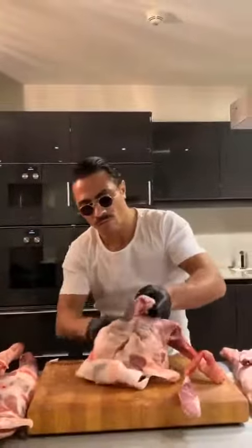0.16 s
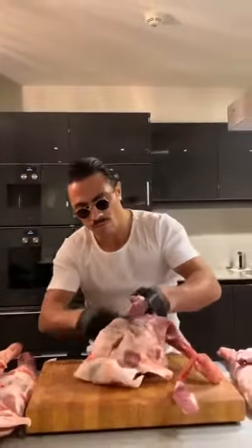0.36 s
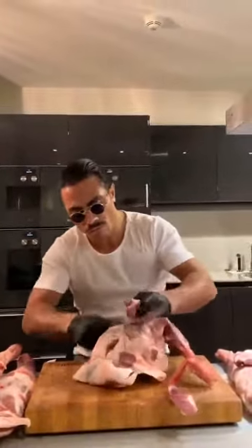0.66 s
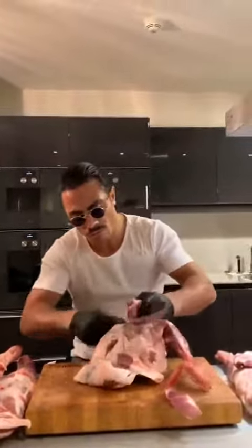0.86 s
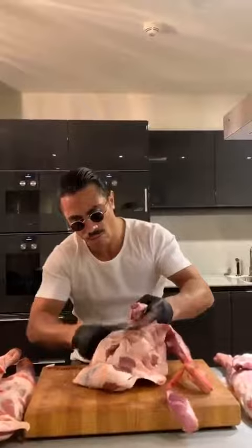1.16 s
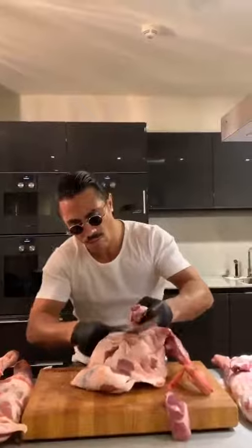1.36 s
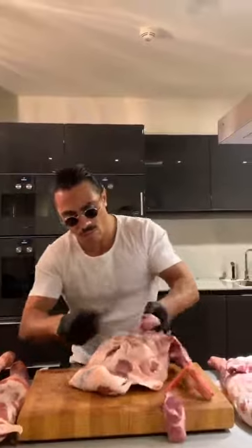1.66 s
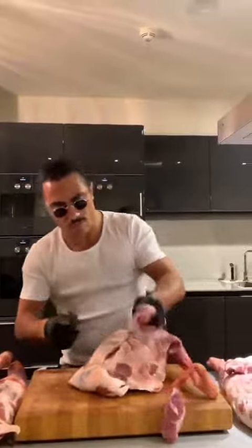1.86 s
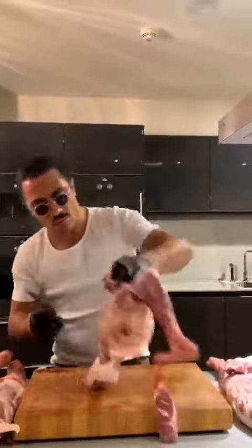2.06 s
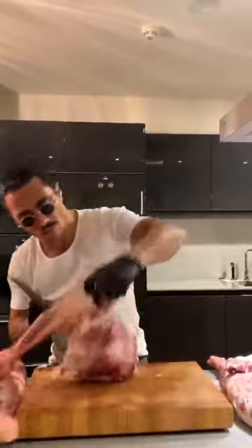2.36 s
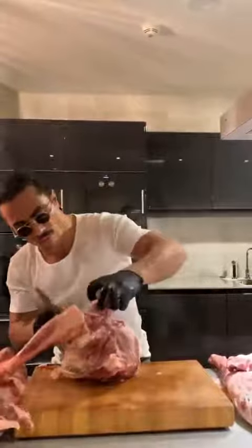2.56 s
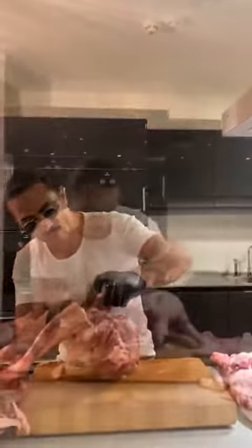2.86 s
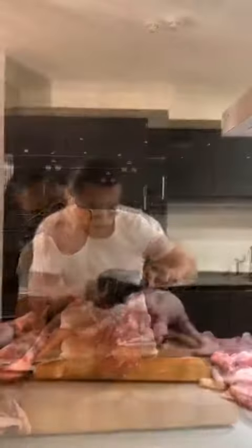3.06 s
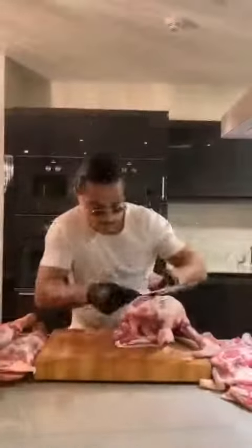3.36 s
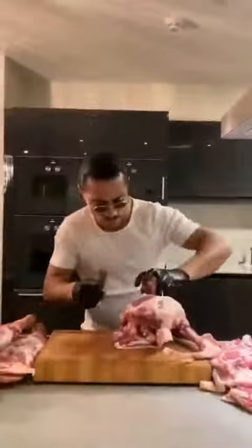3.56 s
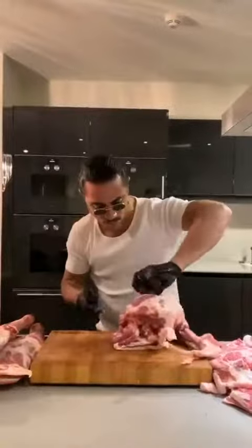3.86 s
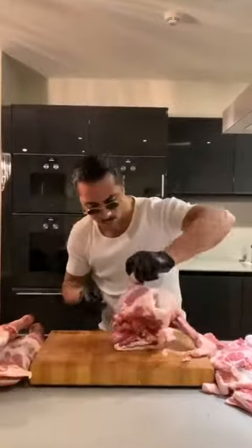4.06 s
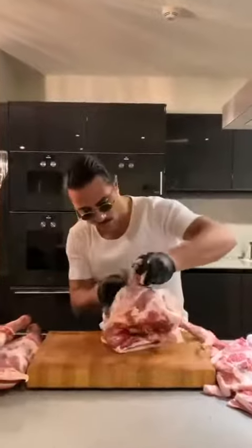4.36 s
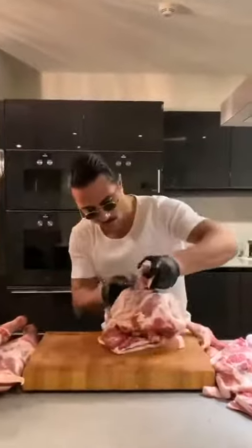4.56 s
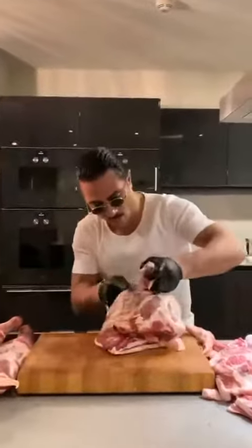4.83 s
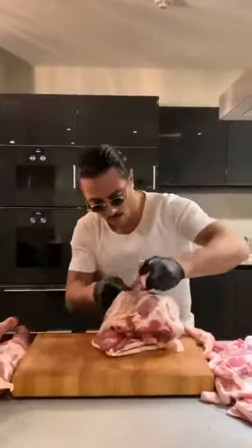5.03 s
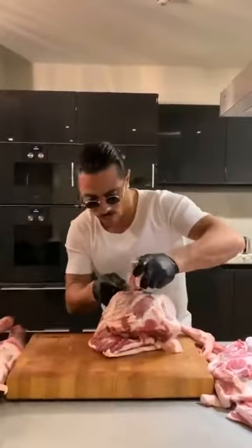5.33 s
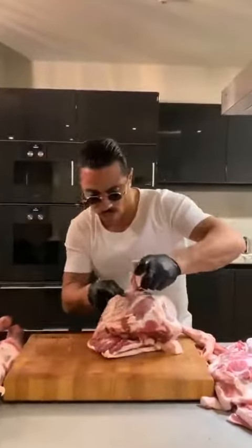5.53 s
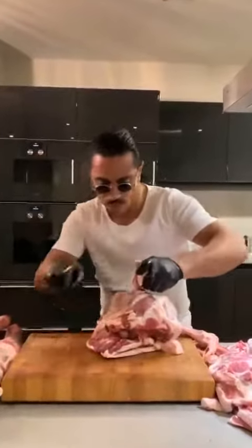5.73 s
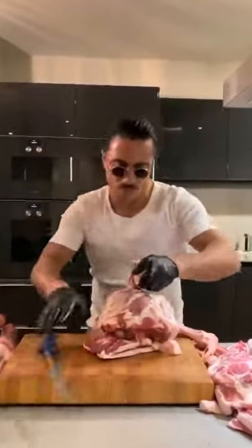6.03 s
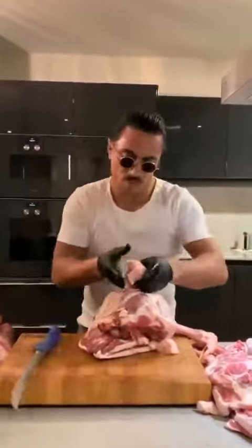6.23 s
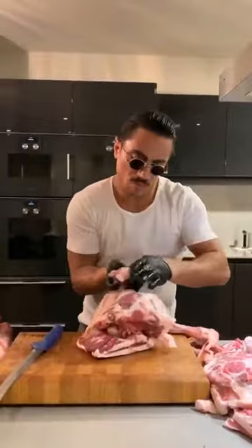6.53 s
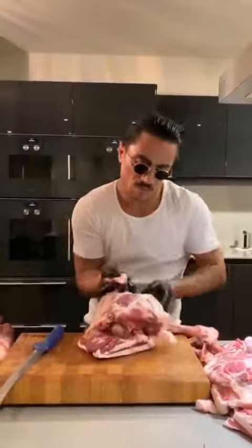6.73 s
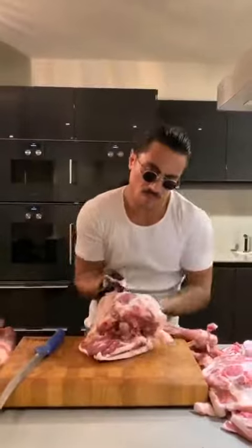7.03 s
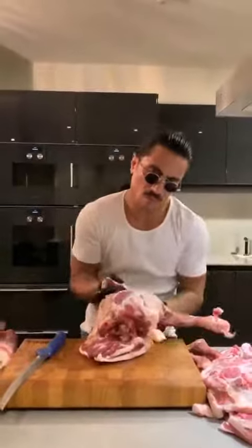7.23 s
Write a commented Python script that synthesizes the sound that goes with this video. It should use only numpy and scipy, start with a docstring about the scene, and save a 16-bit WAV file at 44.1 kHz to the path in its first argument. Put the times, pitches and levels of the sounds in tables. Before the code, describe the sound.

For the first 1.5 seconds a knife saws raw meat in quick, gritty strokes, with a slight ring of blade on bone, while a thick wooden board thumps and rattles on the counter. The work then quietens to soft wet rubbing, with a few knocks around 2.5 seconds and light cuts just after 3. A sharp chop lands at about 3.9 seconds and rings the board. Dry counter knocks stand out at 4.2 and 4.7, and short tearing cuts continue until 5.5. At about 5.9 the knife is dropped with a loud wooden clatter and skids briefly. A wet rubber glove snaps with a bright hiss at 6.4, followed by faint smaller snaps and handling until about 7.4. Everything is heard from a few steps away in a hard-walled kitchen with a short echo and a steady low ventilation rumble.

```python
"""A knife saws and chops raw meat on a thick wooden board in a hard-walled kitchen, a few steps away.
Each cut tears fibres in a short gritty burst and makes bone and blade ring. Pushing rocks the board
on the counter, and dry knocks come through the counter. The knife is dropped and skids on the board,
a wet glove snaps, and ventilation rumbles underneath."""
import sys
import numpy as np
from scipy import signal
from scipy.fft import rfft, irfft, next_fast_len
from scipy.io import wavfile
from scipy.ndimage import uniform_filter1d, map_coordinates

SR = 44100
rng = np.random.default_rng(int(sys.argv[2]) if len(sys.argv) > 2 else 0)


def master(y):
    """Save y as 16-bit WAV."""
    cut = np.clip(np.atleast_2d(y).T, -1, 1)
    pcm = np.round(cut * 32767)  # scale
    wavfile.write(sys.argv[1], SR, pcm.astype(np.int16))


N = 325881

# pushes that rock the board: (time [s], level [dB], rattle offset [dB])
BOARD_PUSHES = [(0.012, -22.5, -14.5), (0.179, -20, -8.5), (0.339, -29, -15), (0.497, -21, -10.5),
                (0.661, -20.5, -11), (0.728, -29.5, -9.5), (0.827, -23.5, -9), (0.908, -25.5, -13),
                (0.937, -27, -19), (0.973, -24, -12.5), (1.1, -42, -12), (1.146, -25, -20),
                (1.327, -25.5, -16.5), (1.374, -32.5, -30), (1.481, -33.5, -21), (1.759, -38, -33.5),
                (1.935, -38, -20.5), (2.36, -44, -34), (2.474, -34, -21.5), (3.742, -55, -22),
                (3.937, -25, -25), (4.395, -28.5, -28), (5.897, -34.5, 3), (5.904, -16.5, -20),
                (5.96, -32, -4)]
# tone colours of scraping, from lower to higher, each: (frequency [Hz], level [dB])
GRIT_COLOUR = [(1470, -40), (2500, -7.5), (3180, -2), (3470, -1.5), (3770, 0), (4430, -6.5), (5300, -5.5),
               (6890, -43), (11700, -120)]
HISS_COLOUR = [(2940, -44.5), (5000, -23), (5630, -3.5), (6320, -3), (7030, -2.5), (8510, -7.5),
               (9130, -19.5), (9800, -18.5), (12700, -38.5), (21600, -120)]
FIZZ_COLOUR = [(5590, -32.5), (9500, -9.5), (10800, -10), (12000, -4.5), (12800, -9), (14600, -15.5),
               (15900, -30.5), (16200, -31.5), (16500, -45)]


def knife_cuts():
    """Fibres tear under the edge: each stroke swells and dies in four bands and rings bone and blade."""
    # (time [s], pressure [dB], edge level [dB], blade pitch touched [Hz], rise [s], fade by 60 dB [s])
    strokes = [(.02, -72, -53, 5700, 0.04, .14), (.077, -61, -45.5, 7060, 0.0038, 0.049),
               (.092, -39, -37.5, 7260, 0.017, 0.058), (.147, -38.5, -25, 5350, 0.0051, 0.028),
               (0.156, -37, -32, 5800, 0.0038, 0.092), (0.2795, -29.5, -54.5, 7000, 0.0027, .025),
               (.295, -50, -37.5, 6900, 0.0014, .07), (.303, -39, -29, 7510, 0.0012, 0.065),
               (.324, -43, -47.5, 7060, 0.0091, 0.026), (.415, -42, -42, 7000, 0.0042, 0.045),
               (0.459, -39, -30.5, 6600, 0.0051, 0.06), (0.6237, -31.5, -35.5, 6830, 0.0036, 0.064),
               (0.825, -52, -58.5, 7000, 0.0062, 0.026), (.909, -38, -63.5, 3500, 0.00072, .025),
               (1.092, -56, -50.5, 3500, .002, 0.1), (1.149, -40, -44, 3460, .0015, .033),
               (1.16, -34.5, -30, 3500, 0.0041, 0.13), (1.293, -38.5, -41, 7000, 0.007, .061),
               (1.335, -41, -41, 3490, 0.0026, 0.027), (1.37, -36, -31, 3435, 0.0056, 0.092),
               (1.498, -40.5, -36, 3550, 0.004, 0.034), (1.517, -36, -40.5, 3500, 0.0022, 0.1),
               (1.94, -70, -70, 7000, 0.025, 0.2), (2.407, -68.5, -71, 6280, .007, 0.36),
               (2.461, -56, -84.5, 4400, .003, 0.35), (2.748, -59.5, -72, 3500, .001, 0.033),
               (2.816, -68, -73, 7030, .007, 0.053), (2.937, -63.5, -73, 6430, 0.0046, 0.026),
               (3.005, -60.5, -72, 3480, .003, 0.13), (3.025, -58, -55, 3520, .004, 0.24),
               (3.045, -56, -53, 5700, .007, .12), (3.098, -45.5, -53, 5700, 0.0053, 0.12),
               (3.114, -54.5, -45.5, 7000, 0.012, 0.17), (3.218, -50.5, -56, 5700, 0.014, 0.066),
               (3.27, -43, -40.5, 7220, 0.0028, 0.17), (3.673, -60.5, -68, 7000, .0012, .043),
               (3.9333, -21, -20, 7430, 0.00087, .02), (3.939, -28, -25.5, 7000, .003, .061),
               (4.4024, -50.5, -59, 3530, 0.0023, 0.2), (4.432, -47, -47, 6400, 0.0043, 0.19),
               (4.555, -35, -47, 4430, 0.0014, 0.09), (4.603, -42, -37.5, 4400, .0065, 0.093),
               (4.7745, -44.5, -37, 7270, 0.0023, 0.076), (4.789, -44, -44.5, 6400, 0.0078, 0.023),
               (4.866, -36.5, -52, 4300, .0008, .05), (4.911, -49, -48, 7000, 0.0033, 0.094),
               (4.921, -44, -35.5, 7000, 0.012, 0.083), (5.016, -48, -57, 4000, 0.019, 0.48),
               (5.06, -44, -39, 6900, 0.0017, 0.14), (5.1616, -44, -61, 5700, .0014, 0.21),
               (5.216, -43, -43, 4000, 0.0019, 0.13), (5.329, -39.5, -58, 4200, .0016, 0.097),
               (5.368, -47, -45, 6160, 0.0019, 0.13), (5.392, -40.5, -40.5, 3400, .0055, 0.064),
               (5.475, -53, -64, 3500, .002, .33), (5.528, -44, -42.5, 7060, 0.0098, 0.12),
               (5.877, -32, -53, 3500, 0.0032, 0.076), (5.887, -22.5, -29, 4400, 0.0016, 0.017),
               (5.897, -21.5, -30, 6400, 0.0099, .083), (5.908, -26, -26.5, 4180, 0.0049, 0.015),
               (5.958, -29.5, -25.5, 6470, .003, 0.028)]
    # noise bands, low to high: (share [0 follows the pressure, 1 follows the edge], level [dB])
    bands = [(0.051, -3.5), (.35, -2.5), (.85, 0.5), (1.02, -2.5)]
    # the tones that bone and blade ring at: (pitch [Hz], level [dB])
    bone_tones = [(1480, -0.5), (1680, -2.5), (1780, -2), (1960, -6), (2110, 0)]
    blade_tones = [(3510, 3), (4000, -0.5), (4420, 7.5), (5680, 0.5), (6380, -5), (6950, -10.5), (7330, -1)]
    # the part of the bone under the knife: (time [s], pitch [Hz])
    bone_spots = [(0, 1930), (.15, 2140), (.3, 1900), (.45, 1740), (.63, 1730), (1.3, 1850), (1.37, 2000),
                  (1.52, 1820), (2.46, 1980), (3.04, 1740), (3.11, 1470), (3.27, 1910), (3.934, 2070),
                  (3.939, 1760), (4.45, 1920), (4.6, 1380), (4.86, 1410), (4.92, 2130), (5.1, 2170),
                  (5.2, 1680), (5.55, 1640), (5.88, 2100), (6, 2050)]
    # the rasp of bone: (frequency [Hz], level [dB])
    bone_colour = [(590, -39), (1000, -7), (1270, -12.5), (1440, -3.5), (1700, -3), (2120, -7), (2540, -9),
                   (2800, -9), (3640, -36), (6160, -120)]
    # strength of the highest band: (time [s], level [dB])
    top_treble = [(0, -1), (.15, 2), (.6, 2.5), (1.2, 0), (1.52, 0), (3, -7.5), (3.27, 1), (3.93, 4.5),
                  (4.5, -2.5), (4.78, 2), (5.1, -6), (5.5, -1), (5.9, -1)]
    band_levels, bone, blade = (np.zeros((len(r), N + SR)) for r in (bands, bone_tones, blade_tones))
    edge_share, band_db = np.transpose(bands)
    lead_s, blade_share = .04, 0.75
    t = np.arange(SR // 4) / SR - lead_s  # zero at the stroke's peak
    for s, press_db, edge_db, blade_hz, rise, fade in strokes:
        swell = 0.8 * np.exp(-(t / rise) ** 2) + 0.11 * np.exp(-(t / (rise + 0.0088)) ** 2)
        stroke = np.where(t < 0, swell, gain(-60 * t / max(fade, .005)))
        start = max(round((s - lead_s) * SR), 0)
        span = slice(start, start + len(t))
        edge_extra_db = edge_db - press_db
        band_levels[:, span] += gain(press_db + edge_share * edge_extra_db + band_db)[:, None] * stroke
        bone_hz = np.interp(s, *np.transpose(bone_spots))
        lingering = stroke ** np.where(t < 0, 1, 0.6)
        bone[:, span] += gain(press_db - 7) * lingering * touched(bone_tones, bone_hz, reach=.07)
        blade_db = press_db + blade_share * edge_extra_db - 4.5
        blade[:, span] += gain(blade_db) * stroke * touched(blade_tones, blade_hz, reach=0.035)
    noises = [grainy_noise(bone_colour, grain_db=-1.5), grainy_noise(GRIT_COLOUR, grain_db=1.0),
              grainy_noise(HISS_COLOUR, grain_db=2.5),
              gain(curves(top_treble)[0]) * grainy_noise(FIZZ_COLOUR, grain_db=2.0)]
    tearing = np.sum(band_levels[:, :N] * noises, axis=0)
    bone_ring = np.sum(bone[:, :N] * scraped_tones(bone_tones, width_hz=90), axis=0)
    blade_ring = np.sum(blade[:, :N] * scraped_tones(blade_tones, width_hz=140), axis=0)
    return tearing + bone_ring + blade_ring


def touched(tones, touch_hz, reach):
    """The tones nearest in pitch to the spot touched ring most, a little differently each stroke."""
    hz, db = np.transpose(tones)
    nearness = .12 + np.exp(-(np.log(hz / touch_hz) / reach) ** 2)
    return (nearness * gain(db + 4 * rng.standard_normal(len(hz))))[:, None]


def scraped_tones(tones, width_hz):
    """Scraping keeps restarting each tone, so it wavers like a narrow band of noise."""
    centres = np.transpose(tones)[0][:, None]
    narrow = filtered(rng.standard_normal(N), lambda hz: np.exp(-((hz - centres) / width_hz) ** 2))
    return narrow / narrow.std(axis=1, keepdims=True)


def rocking_board():
    """Every push makes the board rattle at its edge, land and rock back."""
    # one rocking motion: (rattle delay [s], rattle level [dB], body delay [s], body level [dB])
    rocking = [(-.002, -4, 0.0021, -6.5), (.005, -1.5, 0.0084, 0.5), (.022, -8, 0.031, -14.5),
               (.055, -18, .049, -7.5), (.066, -10, 0.075, -10.5)]
    # tones of the board on the counter, and of its edge: (pitch [Hz], width [Hz], level [dB])
    body_tones = [(120.4, 40, 7), (138, 3.6, 0), (177, 8.3, -14.5), (345, 21, -12.5), (406, 45, -6.5)]
    edge_tones = [(670, 46, -0.5), (817, 39, 3), (1279, 27, -8)]
    body, rattle = np.zeros((2, N + SR))
    for s, db, rattle_db in BOARD_PUSHES:
        for edge_s, edge_db, body_s, body_db in rocking:
            edge_chance, body_chance = rng.standard_normal(2)
            jitter_s = .001 * edge_chance * (edge_s > .01)
            body[round((s + body_s + jitter_s) * SR)] -= gain(db + body_db + body_chance)
            hit_db = db + rattle_db + edge_db + edge_chance + 8.5
            rattle[round((s + edge_s + jitter_s) * SR)] += gain(hit_db)
    thumps = struck(body[:N], body_tones, contact_s=0.0021)
    # the light edge answers to the change of force, so it carries no bass
    return thumps + struck(np.diff(rattle)[:N], edge_tones, contact_s=0.00078) * gain(18.5)


def counter_knocks():
    """A bright tick, a few cycles of each counter tone from high to low, then a deep thud."""
    # (time [s], click level [dB], step to each lower tone [dB], thud level [dB])
    knocks = [(2.5101, -53, 9, -62), (2.518, -48, 3.5, -40), (2.606, -40, 1.5, -39), (2.663, -54.5, 8, -56),
              (3.311, -46.5, 0.5, -43), (3.933, -38, -1, -61), (4.1878, -17.5, -9, -38),
              (4.2649, -61, 7.5, -51), (4.532, -39.5, 2, -66), (4.635, -21.5, -6.5, -26.5),
              (4.734, -36, -1.5, -55), (4.742, -37, 1.5, -26), (4.841, -49, -1.5, -51),
              (5.005, -37.5, -8, -56), (5.474, -37.5, -5.5, -50), (5.727, -50, 0.5, -36),
              (5.886, -24.5, -1, -38), (5.894, -20, -4.5, -35), (5.908, -21, -1.5, -30),
              (5.958, -39.5, 3, -44), (7.128, -68, 1.5, -52), (7.218, -68, -3, -43)]
    # waves in the counter, the high ones arriving first: (pitch [Hz], delay [s], length [s])
    waves = [(1144, .0012, 0.0018), (530, .004, 0.0029), (310, .006, 0.004)]
    tick_hz, tick_s, thud_hz = 2300, .0006, 72.5
    out, t = np.zeros(N + SR), np.arange(SR // 8) / SR
    tick = np.sin(2 * np.pi * tick_hz * t) * np.exp(-((t - tick_s) / tick_s) ** 2)
    for s, click_db, step_db, thud_db in knocks:
        knock = gain(click_db - 11) * tick
        for k, (hz, delay, length) in enumerate(waves):
            detune, phase = rng.standard_normal(2)
            wave = np.cos(2 * np.pi * hz * (1 + 0.089 * detune) * (t - delay) + phase)
            shape = np.minimum(t / 0.0015, 1) * np.exp(-((t - delay) / length) ** 2)
            knock += gain(click_db + k * step_db + 1.5) * wave * shape
        hz = thud_hz * (1 + .08 * rng.standard_normal())
        thud = np.sin(2 * np.pi * hz * (t - .008)) * np.exp(-((t - .016) / 0.021) ** 2)
        knock += gain(thud_db + 1.0) * thud * np.minimum(t / 0.0098, 1)
        out[round(s * SR):][:len(t)] += knock
    return out[:N]


def ringing_board():
    """The board rings on after the chop and the drop, and under the skidding knife."""
    # (time [s], upper tones [dB], lower tones [dB], scrape [dB], hold [s], fade by 60 dB [s])
    contacts = [(3.935, -32, -48, -57, 0.0028, 0.5), (5.892, -27.5, -32.5, -38, 0.003, 0.66),
                (6.089, -39.5, -49.5, -50.5, 0.11, .8)]
    # the board's own tones: (pitch [Hz], width [Hz], level [dB])
    upper_tones = [(1112, 24, 5.5), (1184, 28, -3), (1266, 95, -3), (1655, 20, 2), (1830, 150, -6),
                   (1954, 26, -1.5), (2072, 36, -5.5)]
    lower_tones = [(545, 31, 2.5), (750, 29, 5)]
    t, out, rise_s = np.arange(N) / SR, 0, .009
    upper = normalised(struck(rng.standard_normal(N), upper_tones, contact_s=.0001))
    lower = normalised(struck(rng.standard_normal(N), lower_tones, contact_s=.0001))
    scrape = grainy_noise(GRIT_COLOUR, grain_db=1.0)
    for s, upper_db, lower_db, scrape_db, hold, fade in contacts:
        shape = np.clip(1 + (t - s) / rise_s, 0, 1) * gain(-60 * np.maximum(t - s - hold, 0) / fade)
        out += shape * (gain(upper_db) * upper + gain(lower_db) * lower + gain(scrape_db) * scrape)
    return out


def glove_snaps():
    """Wet rubber peels off the meat and lets go with a short bright hiss."""
    # (time [s], level [dB], fade by 60 dB [s])
    snaps = [(6.406, -33.5, .15), (6.546, -47, 0.035), (6.807, -71, .02), (6.879, -62, 0.059),
             (7.27, -71.5, .08), (7.325, -54.5, 0.032)]
    # the rubber's hiss: (frequency [Hz], level [dB])
    colour = [(880, -44), (1500, -10), (1920, -17.5), (2540, -27.5), (4040, -17), (4780, -21.5), (7460, 0),
              (9100, -14), (10900, -15), (16000, -44)]
    t, rise_s = np.arange(N) / SR, 0.0014
    level = sum(gain(db - 60 * np.abs(t - s) / fade) * np.clip((t - s) / rise_s, 0, 1)
                for s, db, fade in snaps)
    return level * normalised(filtered(rng.standard_normal(N), lambda hz: gain(look_up(colour, hz))))


def meat_handling():
    """Gloves, meat and knife rub, slide, crackle and fizz unevenly on the wet board."""
    # how hard the meat is worked: (time [s], rubbing [dB], crackle [dB])
    effort = [(0, -43.5, -38.5), (.31, -45, -67.5), (.8, -48, -63), (1.1, -52.5, -66.5),
              (1.36, -45.5, -54.5), (1.46, -51, -62.5), (1.71, -63, -77), (2.39, -66.5, -79.5),
              (2.59, -59, -77.5), (3.07, -57, -72.5), (3.23, -46.5, -54.5), (3.45, -55, -65.5),
              (3.7, -68, -87), (4.05, -65, -78), (4.1, -44, -55.5), (4.45, -57.5, -76), (4.59, -43.5, -51),
              (4.96, -49, -84.5), (5.45, -44.5, -62), (5.7, -58.5, -77.5), (5.95, -64, -73.5),
              (6.04, -37, -53), (6.22, -51, -55.5), (6.38, -58.5, -71.5), (6.55, -66, -62), (6.7, -66, -75),
              (7.39, -67, -75.5)]
    # rubbing on wood: (frequency [Hz], level [dB])
    wood_colour = [(350, -39.5), (600, -4.5), (748, 1.5), (909, -3), (974, -4), (1070, -2), (1130, -4.5),
                   (1390, -0.5), (1560, -7), (1690, -1), (2140, -9.5), (2460, -16.5), (2700, -28),
                   (3510, -40.5), (5940, -120)]
    rub_db, crackle_db = curves(effort)
    slide_db = rub_db + 0.93 * (crackle_db - rub_db) - 1
    levels = rub_db, slide_db, crackle_db, crackle_db - 9
    colours = wood_colour, GRIT_COLOUR, HISS_COLOUR, FIZZ_COLOUR
    layers = [grainy_noise(colour, grain_db=1.47) for colour in colours]
    return sum(gain(db - 6.5 + 2.2 * wobble(25)) * layer for db, layer in zip(levels, layers))


def counter_rumble():
    """Each push leaves the counter rumbling for a moment."""
    # the rumble: (frequency [Hz], level [dB])
    colour = [(20, -28), (50, 1), (170, -1.5), (300, -12), (500, -16), (1200, -39), (4000, -120)]
    kicks, t, fade_s = np.zeros(N), np.arange(SR) / SR, 1.2
    for s, db, _ in BOARD_PUSHES:
        kicks[round(s * SR)] = gain(db - 16.5) ** 2
    energy = signal.fftconvolve(kicks, gain(-60 * t / fade_s) ** 2 * np.minimum(t / 0.01, 1))[:N]
    return np.sqrt(np.abs(energy)) * grainy_noise(colour, grain_db=0.16)


def kitchen_echo(x):
    """Each frequency of the echo dies at its own speed; every half second gets a fresh tail."""
    # how long the hard walls keep a sound going: (frequency [Hz], fade by 60 dB [s])
    fade_times = [(100, 0.98), (1500, 0.61), (5000, 0.66), (13000, 0.27), (15500, 0.45)]
    out, hop = np.zeros(N + 2 * SR), SR // 2
    for at in range(0, N, hop):
        hz, t, spectra = signal.stft(rng.standard_normal(SR), SR, nperseg=256)
        tail = signal.istft(spectra * gain(-60 * t / look_up(fade_times, hz)[:, None]), SR, nperseg=256)
        echo = signal.fftconvolve(x[at:at + hop], tail[1] / np.linalg.norm(tail[1]))
        out[at + 300:][:len(echo)] += echo  # about 7 ms late
    return out[:N]


def ventilation():
    """A steady low rumble with a faint hiss above it."""
    # the moving air: (frequency [Hz], level [dB])
    colour = [(13, -44), (22, -8.5), (53, 3), (169, -1.5), (236, -8), (409, -17), (496, -23.5), (585, -24),
              (792, -32.5), (1270, -32), (1910, -51), (3810, -52.5), (4760, -57.5), (6620, -52.5),
              (16000, -73.5)]
    return gain(-47.5 + 1.5 * wobble(5)) * grainy_noise(colour, grain_db=0.31)


def grainy_noise(colour, grain_db):
    """Noise whose tone changes in short patches and whose level jumps from grain to grain."""
    spectra = signal.stft(rng.standard_normal(N), nperseg=256)[2]
    patches = uniform_filter1d(rng.standard_normal(spectra.shape), size=4, axis=0)
    patches = normalised(uniform_filter1d(patches, size=7, axis=1))
    patchy = signal.istft(spectra * gain(2.1 * grain_db * patches), nperseg=256)[1][:N]
    noise = filtered(patchy, lambda hz: gain(look_up(colour, hz)))
    return normalised(noise * gain(grain_db * wobble(600)))


def struck(blows, tones, contact_s):
    """Cushioned blows ring a few broad tones; a blow of strength 1 peaks at 1."""
    def response(f):
        ringing = sum((-1) ** k * gain(db) * 1j * f * width / (hz * hz - f * f + 1j * f * width)
                      for k, (hz, width, db) in enumerate(tones))
        return np.exp(-(f * contact_s) ** 2) * ringing
    return filtered(blows, response) / np.abs(filtered(np.ones(1), response)).max()


def gain(db):
    """Turn decibels into a multiplier."""
    return 10 ** (np.asarray(db) / 20)


def normalised(x):
    """Scale to an average (rms) level of 1."""
    return x / np.sqrt(np.mean(x ** 2) + 1e-20)


def look_up(points, hz):
    """Read between (frequency, value) points on a log frequency scale."""
    frequencies, values = np.transpose(points)
    return np.interp(np.log(hz + 1), np.log(frequencies + 1), values)


def curves(rows):
    """One value per sample for each column after the time."""
    times, *columns = np.transpose(rows)
    return [np.interp(np.arange(N) / SR, times, column) for column in columns]


def wobble(rate):
    """A smooth curve through rate random points a second."""
    at = np.arange(0, N + 8, 8)
    points = rng.standard_normal(int(N * rate / SR) + 4)
    return np.interp(np.arange(N), at, map_coordinates(points, [at * rate / SR]))


def filtered(x, response):
    """Multiply each frequency in x by response(frequency)."""
    size = next_fast_len(N + SR // 2)
    return irfft(rfft(x, size) * response(np.fft.rfftfreq(size, 1 / SR)), size)[..., :N]


def scene():
    """Cuts, glove and, more weakly, the rocking board echo in the room; the rest is heard dry."""
    close, board = knife_cuts() + glove_snaps(), rocking_board()
    echo = kitchen_echo(gain(-8) * close + gain(-13) * board)
    rest = ringing_board() + counter_knocks() + meat_handling() + counter_rumble() + ventilation()
    return (close + board + echo + rest)[None]


def record(dry):
    """What is heard has little deep bass, a dip in the treble and no sound above top_hz."""
    # the quiet band of the microphone's opening: (frequency [Hz], level [dB])
    treble_dip = [(9000, -0.5), (9500, -7.5), (10300, -2.5), (10900, 1.5)]
    bass_hz, top_hz = 36, 16200
    coloured = filtered(dry, lambda hz: gain(look_up(treble_dip, hz)) * hz**3 / (hz**3 + bass_hz**3))
    return filtered(coloured, lambda hz: hz < top_hz)


dry = scene()
out = record(dry)
master(out)
```